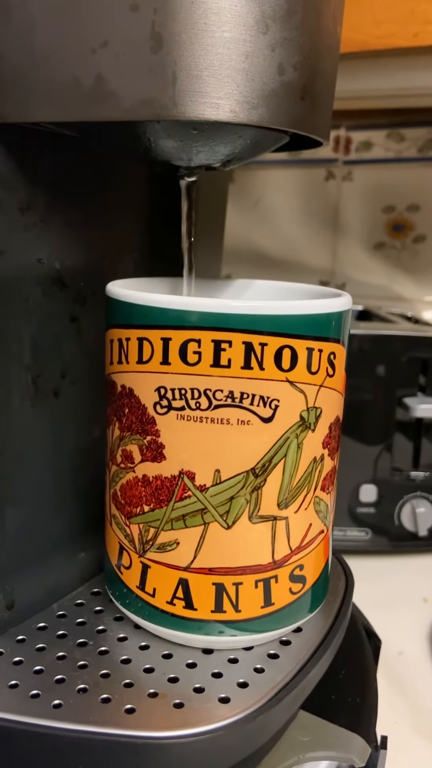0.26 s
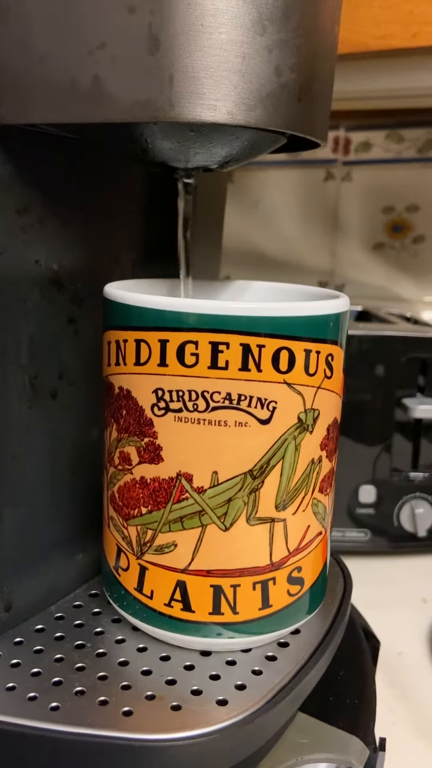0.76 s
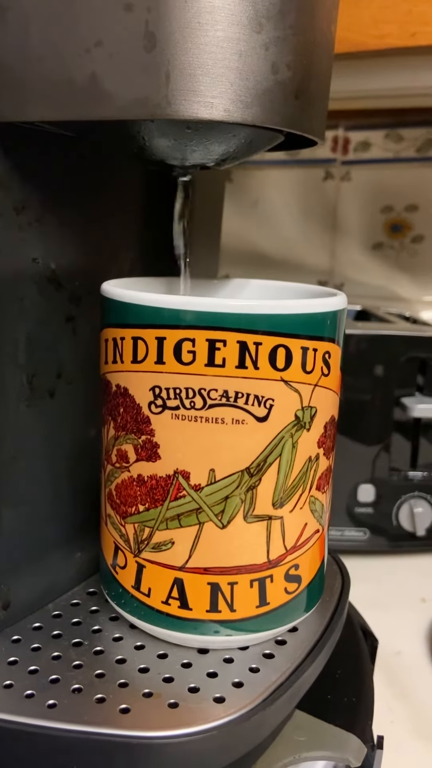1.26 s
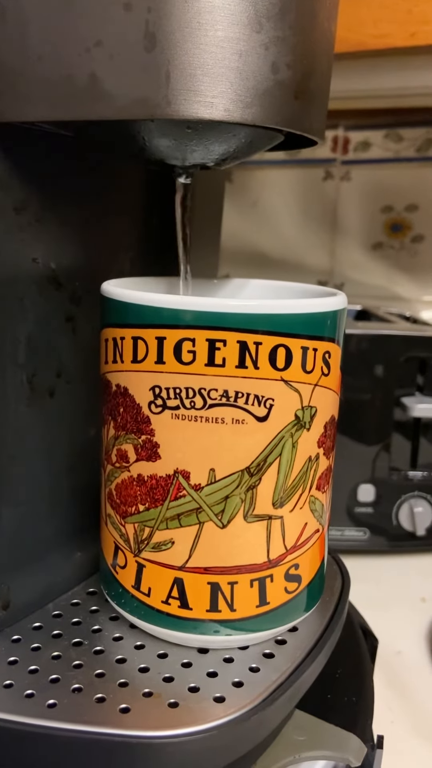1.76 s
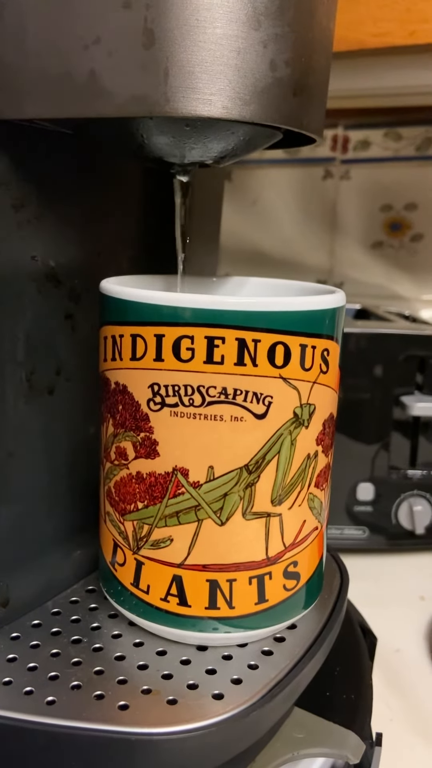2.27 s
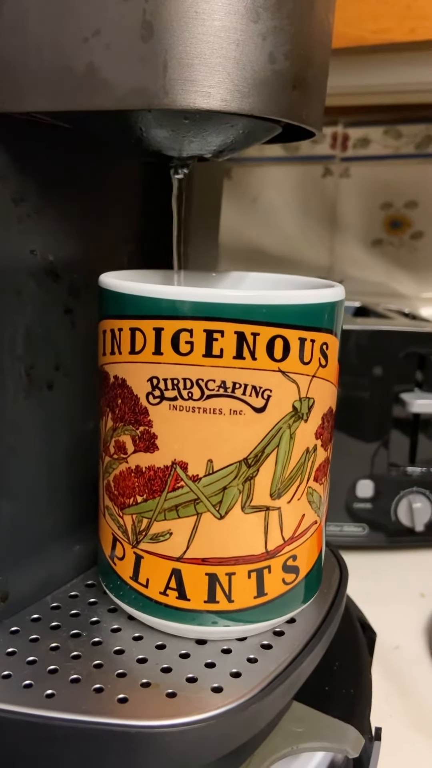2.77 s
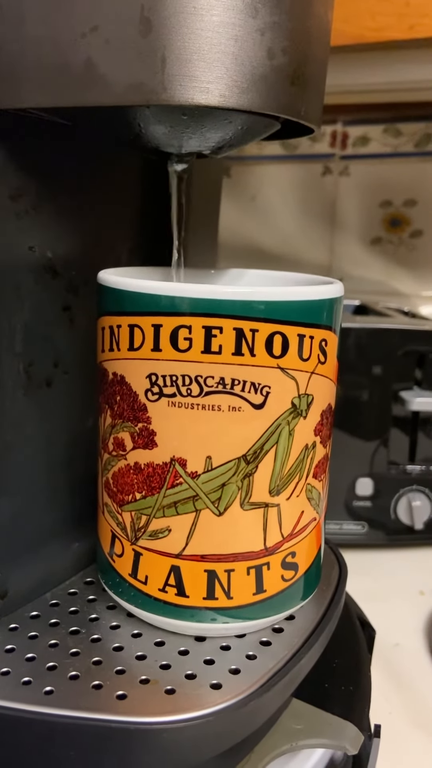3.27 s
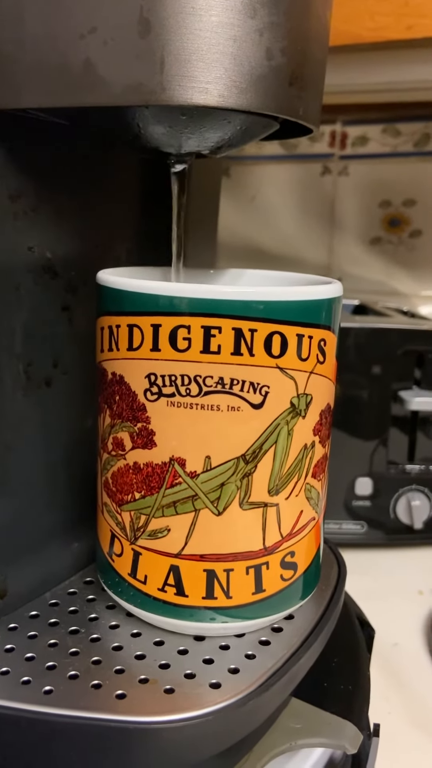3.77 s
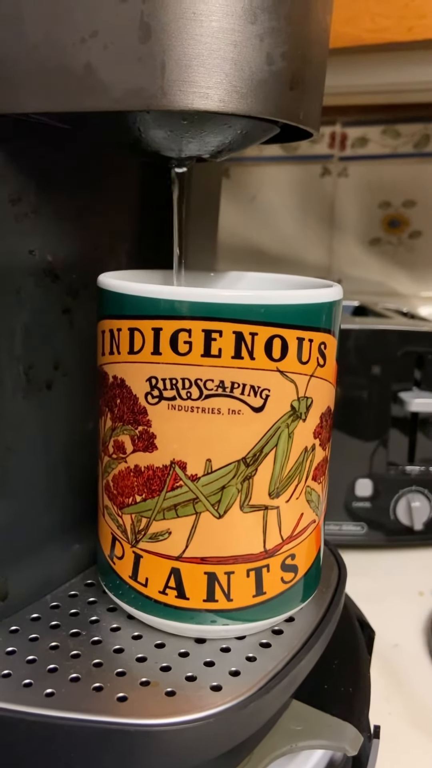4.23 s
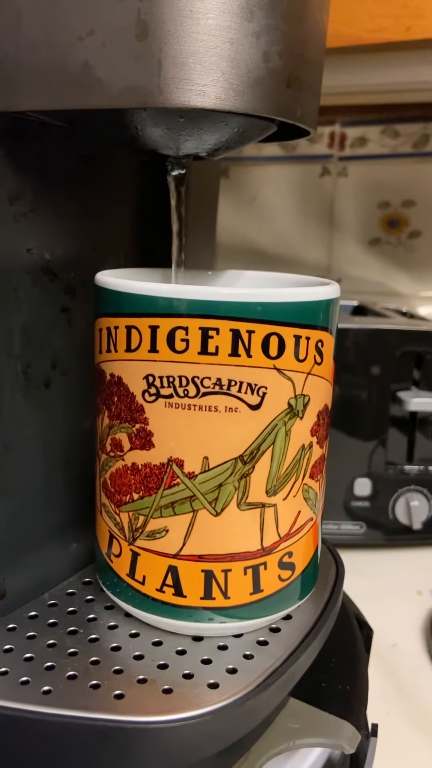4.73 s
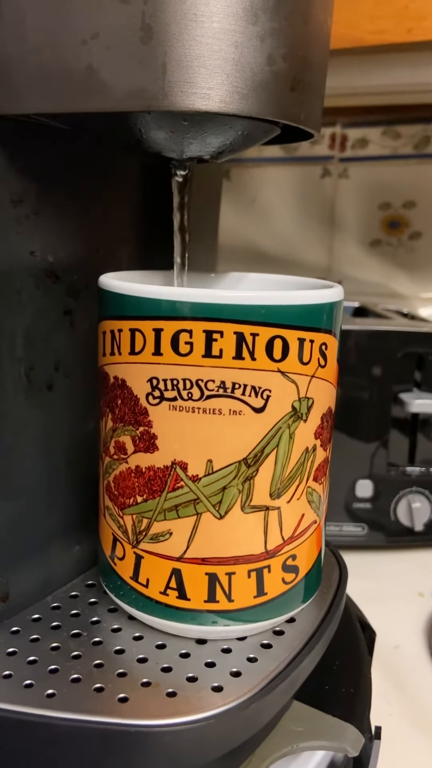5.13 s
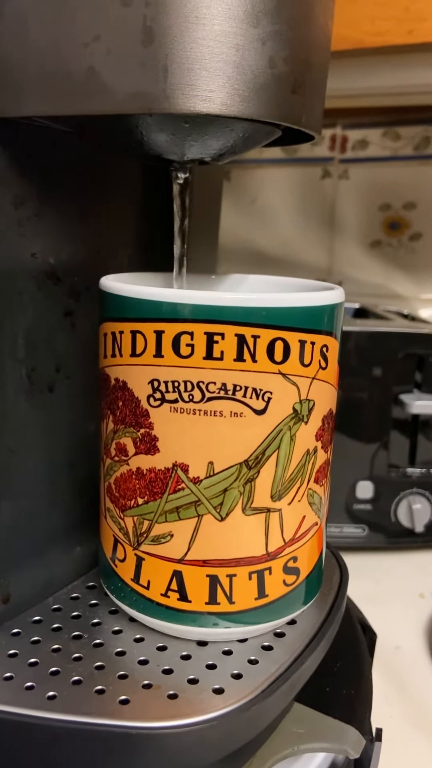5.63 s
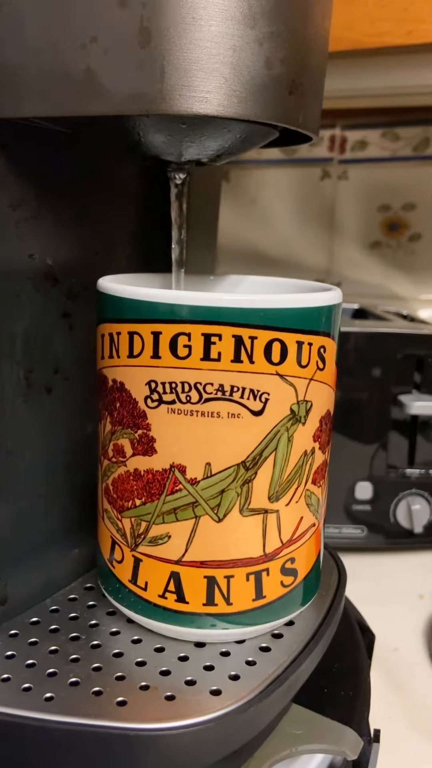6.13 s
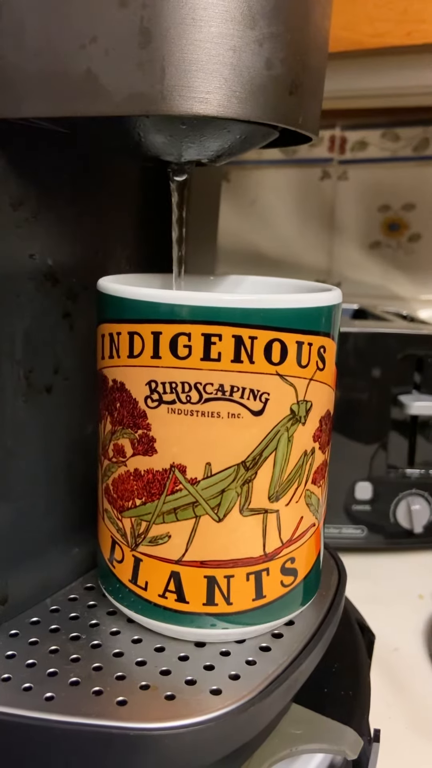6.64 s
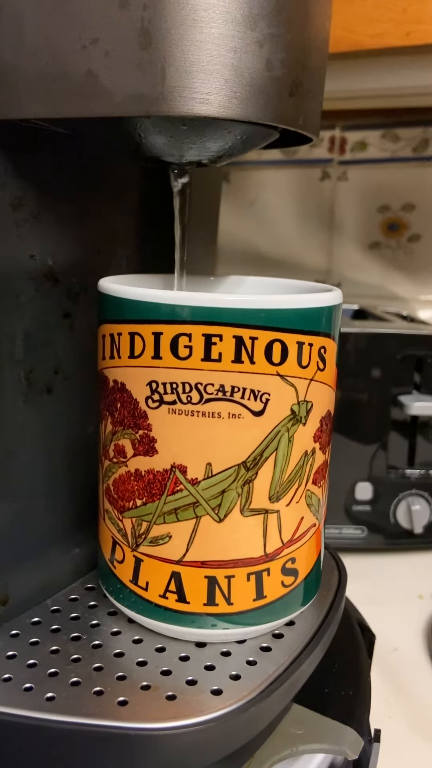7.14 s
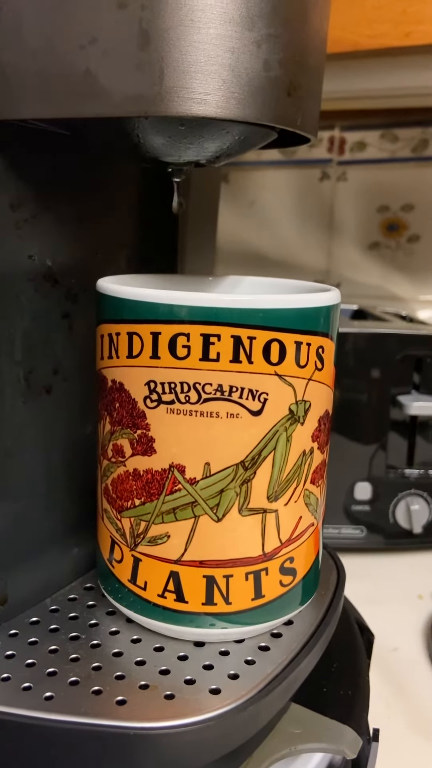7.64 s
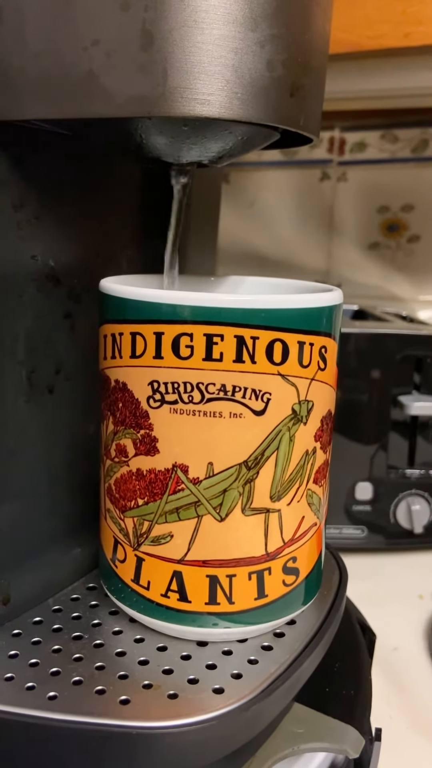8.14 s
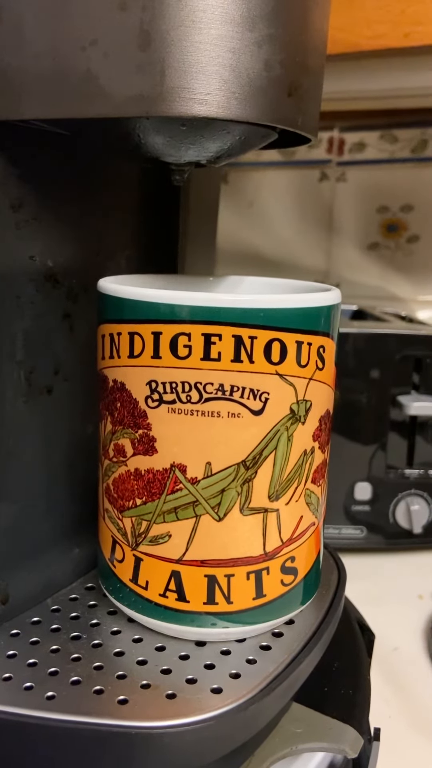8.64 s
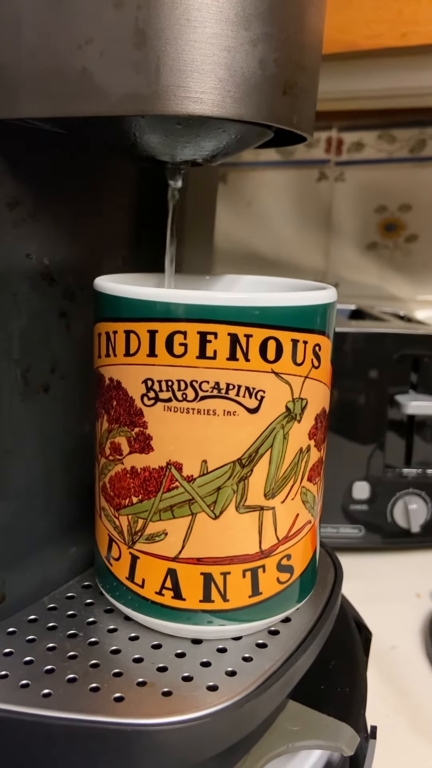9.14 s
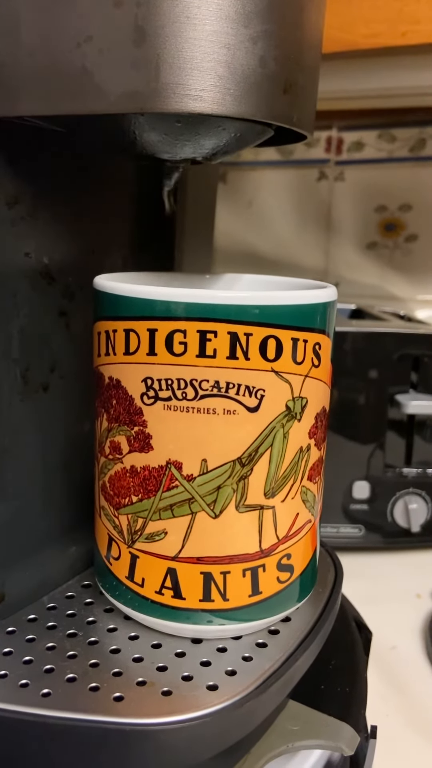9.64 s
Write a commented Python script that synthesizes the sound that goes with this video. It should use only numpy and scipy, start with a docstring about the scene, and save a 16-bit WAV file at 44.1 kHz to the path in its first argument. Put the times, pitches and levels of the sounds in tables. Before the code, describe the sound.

Water runs into a mug with small plops over a pump's hum, until the coffee maker sputters with bubbling air and hissing spurts.

```python
"""A coffee machine's pump hums while water runs into a mug, where bubbles plop and droplets tick.
Then the pump runs dry, speeds up and drives air through the wet nozzle. The air breaks through
the water in gurgles and pops that ring the hollow brew head, and steam spits out in bursts.
It is all heard in a small kitchen, close to a microphone with two ports (left and right openings)."""
import sys
import numpy as np
from scipy import signal
from scipy.fft import rfft, irfft
from scipy.io import wavfile
from scipy.ndimage import uniform_filter1d

SR = 44100
rng = np.random.default_rng(int(sys.argv[2]) if len(sys.argv) > 2 else 0)


def output_pcm(signal):
    """Save a mono or channel-first signal as 16-bit PCM at the path in sys.argv[1].

    Samples are clipped to [-1, 1] before scaling.
    """
    pcm = np.clip(np.atleast_2d(signal).T, -1, 1) * 32767
    wavfile.write(sys.argv[1], SR, np.round(pcm).astype(np.int16))


N = 436590
T = np.arange(N) / SR

# Air seeping through the nozzle between bursts: (time [s], gurgle level [dB], hiss level [dB])
SEEP = [(5.55, -90, -58.5), (5.82, -49, -59), (6.07, -44.5, -62.5), (6.4, -42, -61), (6.82, -55, -57.5),
        (7.06, -48, -68), (7.14, -60, -76), (7.27, -40.5, -93), (7.285, -42.5, -61.5), (7.62, -43.5, -59.5),
        (7.86, -55, -61.5), (8.1, -39, -59), (8.32, -50, -70), (8.36, -44, -63), (8.7, -41.5, -56),
        (9.0, -41.5, -63.5), (9.11, -49, -78), (9.2, -41.5, -62.5), (9.46, -51, -68), (9.52, -50, -99),
        (9.55, -43, -88), (9.8, -43, -66.5), (9.84, -51, -90), (9.9, -43, -82)]
# Slugs of air breaking through the water: (start [s], length [s], level [dB])
GURGLES = [(5.665, 0.043, -56), (5.89, 0.12, -28.5), (6.925, 0.056, -31), (7.28, 0.054, -41),
           (7.385, 0.012, -36), (7.56, 0.09, -38), (7.925, 0.14, -27), (8.205, 0.053, -38),
           (8.4, 0.023, -38.5), (8.8, 0.14, -30), (9.12, 0.067, -41)]
# Spurts of steam: (start [s], length [s], level [dB])
SPURTS = [(5.885, 0.056, -45), (6.65, 0.066, -57), (6.89, 0.065, -45.5), (7.68, 0.047, -57),
          (7.89, 0.13, -46), (8.09, .01, -69), (8.205, 0.015, -59), (8.56, 0.011, -55), (8.70, 0.058, -52),
          (8.795, 0.072, -48.5), (9.055, 0.005, -57.5), (9.225, 0.014, -55.5), (9.6, 0.023, -66.5),
          (9.865, .02, -66)]
# Single air pops: (time [s], peak level [dB], brightness [dB per octave])
POPS = [(5.663, -43, 12), (5.673, -32.5, 18), (5.699, -33, 21), (5.714, -33, 5), (5.848, -32, 27),
        (5.861, -29, 34), (5.878, -21, 27), (5.884, -26, 11), (5.902, -24, 38), (5.913, -17.5, -2),
        (5.98, -14.5, -5), (5.991, -15, -21), (6.01, -28, -4), (6.03, -27, -1), (6.048, -28.5, 9),
        (6.131, -30, 3), (6.188, -26.5, 16), (6.221, -28, -18), (6.307, -33, -32), (6.332, -23.5, -11),
        (6.442, -26.5, -14), (6.462, -23.5, -13), (6.498, -20.5, -34), (6.525, -23.5, -24),
        (6.595, -30, -3), (6.659, -21.5, -12), (6.864, -25, 25), (6.901, -14.5, -8), (6.917, -12.5, -11),
        (6.93, -27.5, 8), (6.953, -31, -14), (6.966, -17, 16), (6.979, -24.5, 11), (6.996, -26, 4),
        (7.07, -27, -12), (7.13, -27, -6), (7.161, -29.5, 4), (7.177, -27.5, -2), (7.227, -28, -5),
        (7.28, -30, 5), (7.291, -36.5, -17), (7.314, -33, 13), (7.361, -19.5, -22), (7.379, -36, -22),
        (7.5, -20.5, -32), (7.542, -23.5, -12), (7.56, -21, -34), (7.662, -24.5, -9), (7.677, -27.5, -10),
        (7.733, -30, -5), (7.931, -15, -26), (7.954, -16, 5), (7.976, -28, -34), (8.023, -21, 24),
        (8.047, -24, -6), (8.07, -26.5, -4), (8.119, -32.5, -6), (8.144, -33, 4), (8.163, -30, 11),
        (8.212, -21, -4), (8.241, -21.5, -41), (8.262, -32, -12), (8.306, -25.5, -7), (8.346, -29, -18),
        (8.415, -25, -10), (8.525, -23, -13), (8.558, -18, -22), (8.569, -22, -22), (8.658, -29, 2),
        (8.708, -19, -19), (8.722, -20.5, -5), (8.789, -22, -5), (8.8, -29.5, 4), (8.878, -20.5, -5),
        (8.901, -15.5, -6), (8.924, -20.5, 4), (8.949, -20, -12), (8.981, -21.5, -1), (9.064, -29, 17),
        (9.119, -27.5, 5), (9.218, -27.5, 10), (9.227, -25.5, 6), (9.269, -23, 14), (9.316, -24, 5),
        (9.329, -19, -9), (9.361, -22.5, 13), (9.376, -24.5, 12), (9.419, -25, 8), (9.45, -22, -15),
        (9.548, -23, -16), (9.568, -28, -4), (9.616, -26, 15), (9.667, -28.5, -5), (9.732, -25, 7),
        (9.783, -28, 14), (9.84, -32, 8), (9.881, -25, 9)]
# Ringing air spaces of the brew head: (pitch [Hz], width [Hz], level [dB])
HEAD_RINGS = [(427, 11, -29.5), (453, 9.1, -5.5), (541.5, 31.7, 8), (647.5, 113, -1.5), (695, 40, 3.5),
              (772, 24, -1.5), (813, 60, -9.5), (960, 32, -0.5), (1051, 24, 1.5), (1087, 120, -17)]
# Tone of the steam hiss: (frequency [Hz], level [dB])
STEAM_TONE = [(1400, 12), (1800, 6.5), (2400, 5.5), (3200, 4.5), (4500, 4.5), (6000, -4), (8500, 3.5),
              (10000, -29), (15000, -39)]
# Fizzy top of the hiss: (frequency [Hz], level [dB])
FIZZ_TONE = [(8500, -8), (10000, 8.5), (12000, 1.5), (13500, 3), (15000, -4)]
# Whistles of the nozzle: (pitch [Hz], width [Hz], level [dB])
WHISTLES = [(2430, 110, -13), (2850, 150, -14), (3500, 200, -15), (4600, 300, -4), (5500, 500, -8),
            (12100, 120, -9)]
# Bubbles in the mug: (time [s], level [dB], pitch [Hz])
PLOPS = [(0.079, -23, 776), (0.241, -28, 785), (0.294, -17, 782), (0.575, -32.5, 1250), (0.752, -23.5, 846),
         (0.893, -24.5, 870), (0.935, -30, 820), (0.997, -33, 1170), (1.018, -21.5, 770), (1.265, -25, 790),
         (1.545, -21, 844), (1.706, -28.5, 1000), (1.848, -25.5, 795), (2.043, -30.5, 1300),
         (2.16, -31, 1330), (2.446, -34, 1250), (2.585, -28, 920), (2.861, -25, 790), (2.907, -26.5, 1070),
         (2.978, -21, 820), (3.329, -18.5, 1265), (3.465, -28, 805), (3.773, -27, 980), (3.812, -27.5, 900),
         (4.285, -27, 1200), (4.395, -23.5, 804), (4.446, -30.5, 975), (4.536, -27.5, 804), (4.6, -31, 800),
         (5.8475, -40, 1950), (5.863, -30, 1770), (6.413, -40.5, 1820), (6.866, -35, 1930),
         (7.0234, -43, 1890), (7.07, -47, 2090), (7.0953, -40.5, 1850), (7.099, -42.5, 2620),
         (7.15, -46, 1950), (7.179, -41, 1760), (7.897, -33, 1960), (8.014, -34, 2460), (8.7467, -35, 2460),
         (8.949, -43, 1560), (9.169, -39, 1560), (9.1853, -34.5, 1560), (9.256, -45, 1550),
         (9.2746, -39, 1550), (9.302, -45, 2710), (9.338, -34, 1550), (9.404, -47, 2700),
         (9.45, -50.5, 2350)]
# Splashed droplets: (time [s], level [dB], centre frequency [Hz])
TICKS = [(0.283, -37, 6360), (0.6894, -35, 4960), (0.935, -29, 7300), (2.0435, -28, 4650),
         (2.214, -34.5, 5000), (2.312, -33, 6300), (2.7875, -32.5, 10400), (2.862, -37, 6110),
         (3.262, -33, 5000), (3.463, -29, 6110), (4.287, -30.5, 5330), (4.361, -33.5, 6130),
         (5.846, -33, 4350), (5.883, -29, 4720), (6.8574, -33, 4560), (7.2835, -43.5, 4100),
         (7.893, -42, 4530), (7.925, -35, 4640), (7.958, -29.5, 4240), (8.097, -44, 5170),
         (8.1448, -33, 4740), (8.2054, -38.5, 5000), (8.359, -39, 6040), (8.572, -48, 4000),
         (8.683, -39, 4480), (8.792, -32, 4520), (9.037, -42, 4590), (9.135, -37.5, 5140),
         (9.1715, -42, 5220), (9.257, -42, 9000), (9.2753, -39.5, 5210), (9.338, -43.5, 5000),
         (9.4034, -58, 4000), (9.5935, -53, 4580), (9.864, -50.5, 4320)]
# Notes of the mug's wall: (pitch [Hz], level [dB], time to fade by 60 dB [s])
MUG_RINGS = [(1560, -15, 0.052), (3590, -1.5, 0.023), (5170, -18, 0.025), (12500, -28, 0.02)]
# Strength of the water stream: (time [s], level [dB])
FLOW = [(0, -51), (3.8, -51), (4.2, -53), (4.65, -54), (5.0, -53), (5.4, -56.5), (5.8, -59), (6, -45)]
# Tone of its spray: (frequency [Hz], level [dB])
SPRAY_TONE = [(350, 2.5), (450, -5), (710, -7.5), (800, -1), (1000, 3.5), (1400, -13.5), (2000, -7),
              (2420, -12), (2900, -10.5), (4000, -14), (6000, -23), (8000, -27.5), (11000, -26.5),
              (13000, -37), (15500, -36.5)]
# The pump shaft speeds up when dry and sags as pressure builds: (time [s], speed [turns per s])
SHAFT_SPEED = [(0, 28.715), (4.25, 28.715), (4.6, 30), (5.2, 35.5), (5.8, 37.2), (5.95, 27.5), (6.4, 28),
               (6.9, 29), (7.15, 32.6), (7.85, 33.3), (8.6, 36.6), (9.15, 41.4), (9.9, 41.5)]
# The hum swells as pressure builds before big spurts: (time [s], rumble level [dB], hum level [dB])
PUMP_LEVELS = [(0, -53.5, -48.5), (4.2, -48.5, -49), (4.5, -44, -63), (4.75, -54, -55), (5.2, -50, -72),
               (5.5, -49, -71), (5.75, -53, -54), (5.97, -44, -45.5), (6.25, -60, -65.5), (6.45, -52, -52),
               (6.66, -53.5, -54), (6.82, -59, -41.5), (6.95, -38, -61), (7.1, -55, -54.5),
               (7.33, -43, -66), (7.6, -53, -59.5), (7.83, -57, -44.5), (8.0, -47, -56), (8.3, -50, -72),
               (8.6, -52, -52), (8.8, -58, -65), (9.9, -57, -61.5)]
# Notes of the hum: (pitch [times shaft speed])
HUM_MULTIPLES = [2, 3, 4, 5, 6, 7, 8, 9, 10, 11]
# Their strengths; three pump chambers stress every third multiple: (level [dB])
HUM_DB = [-11, -13, -25, -37, 2, -7, -9.5, 0, -29, -15.5]
# Notes of the whine while water loads the pump: (pitch [times shaft speed])
WHINE_MULTIPLES = [13, 14, 15, 18, 20, 21, 22, 23, 24, 25, 35, 38, 39, 40, 41, 42, 45, 76]
# Their strengths: (level [dB])
WHINE_DB = [-14, -4, -13, -8, -2, -13, -16, -16, -16, -16, -11, -18, -13, -2.5, -8, -17, -18, -16]
# The whine dies as the pump runs dry: (time [s], level [dB])
WATER_LOAD = [(0, -49.5), (4.21, -49.5), (4.27, -70), (4.8, -88), (9.9, -90)]
# How well the case gives off the hum: (frequency [Hz], gain [dB])
CASE_TONE = [(50, -9), (90, 2), (130, 10), (170, -2), (210, 1.5), (255, 1), (300, -4.5), (335, -8.5),
             (375, 5.5), (420, -22)]
# Ringing of the pump's housing: (pitch [Hz], width [Hz], level [dB])
HOUSING_RINGS = [(54.3, 17.5, -20.5), (164, 24.5, -5), (210.6, 15, 0.5), (285, 62, -33), (422.3, 37, -7.5)]
# Ringing of the hoses: (pitch [Hz], width [Hz], level [dB])
HOSE_RINGS = [(289.9, 34.8, 3.5), (314.4, 8.3, -6)]
# Water surging in the hoses: (time [s], level [dB])
SURGE = [(0, -44), (2, -43), (4.15, -44.5), (4.5, -47.5), (4.8, -54.5), (5.75, -53.5), (6.0, -58),
         (8.2, -82), (8.8, -50), (9.15, -60), (9.9, -65)]
# Tone of the room's quiet background: (frequency [Hz], level [dB])
ROOM_TONE = [(20, -56), (40, -52), (60, 3.5), (120, -11.5), (300, 2.5), (380, -17), (600, -1.5), (715, -11),
             (800, -3), (1200, -6), (1500, -22.5), (3000, -34), (7000, -45), (15000, -40)]
# How long the kitchen echoes: (frequency [Hz], time to fade by 60 dB [s])
ECHO_TIMES = [(100, 0.17), (1000, 0.07), (10000, 0.04)]
# Level of the spread-out stereo wash, with three deep treble gaps: (frequency [Hz], gain [dB])
WASH_LEVELS = [(40, -24), (150, -37), (300, -12.5), (450, -1.5), (800, -5.5), (1050, -6), (2000, 2),
               (4500, -7.5), (6300, 0.5), (7500, -34), (8800, 3), (10500, -27), (12000, 5), (13500, -37)]
# Pump and stream reach the left port duller: (frequency [Hz], gain [dB])
LEFT_SHADE = [(300, 0), (400, -4), (517, -1), (575, -11), (650, -8), (720, 0)]
# Left-right phase difference that sets the stereo width, with flat steps in the treble:
# (frequency [Hz], phase [radians])
STEREO_PHASE = [(50, 0), (180, -.55), (330, -1.5), (450, -4), (1100, -4.1), (1780, -6.6), (2700, -4.3),
                (5200, -6.1), (6800, -3.14), (8100, -3.14), (9600, 0), (11400, 0), (12600, 3.14),
                (14700, 3.14), (15400, 6.2)]
# How much louder the left port is than the right: (frequency [Hz], gain [dB])
LEFT_GAIN = [(80, .6), (220, -1.5), (350, -5), (450, -6.5), (600, -4.5), (800, -4), (1050, 0), (1300, 2),
             (2500, -1.5), (4500, -3), (5500, 0)]


def nozzle():
    """Air forced through the wet nozzle gurgles, hisses and pops once the water runs out."""
    gurgle_seep_db, hiss_seep_db = curves(SEEP)
    gurgle_db = bursts(GURGLES, gurgle_seep_db, swell=1800, sag=29, fall=440)
    hiss_db = bursts(SPURTS, hiss_seep_db, swell=900, sag=31, fall=300)
    fade_in = np.clip((T - 5.55) / 0.1, 0, 1)
    return fade_in * (gurgle(gurgle_db) + steam(hiss_db)) + pops()


def bursts(rows, seep_db, swell, sag, fall):
    """Level in dB of bursts over the seep; each swells, sags and falls at rates in dB per second."""
    start, length, db = np.transpose(rows)[..., None]
    t = T[::40]
    burst_db = db - swell * np.maximum(start - t, 0)
    burst_db -= sag * np.clip(t - start, 0, length)
    burst_db -= fall * np.maximum(t - start - length, 0)
    power = amp(2 * seep_db) + np.interp(T, t, amp(2 * burst_db).sum(0))
    return 10 * np.log10(power)


def gurgle(level_db):
    """A dense patter of bubbles rings the brew head and shakes the case."""
    per_s = 130 + 500 * amp(np.minimum(level_db + 31.5, 0))  # harder bursts make more bubbles
    patter = 0
    for size in (0.985, 1.015):
        bubbles = np.sqrt(29 / per_s) * clicks(per_s, spread_db=1.7) + 0.15 * rng.standard_normal(N)
        patter += brew_head(bubbles, tilt_db=0.5, air_size=size)
    case = ringing_noise([(70.4, 61, -3.5), (103, 31, -4.5), (154, 24, 1), (248, 107, 2.5)])
    return amp(level_db + 1) * unit_level(patter) + amp(-50.5 + 0.51 * (level_db + 40.5)) * case


def pops():
    """Each pop is a sharp puff of air that starts all of the head's air spaces ringing together."""
    out, t = np.zeros(N), np.arange(3000) / SR
    for start, db, tilt_db in POPS:
        puff = 0.29 * rng.standard_normal(len(t)) * decay(t, 0.0025) + 3.8 * (t == 0)
        body = brew_head(puff, tilt_db, air_size=rng.uniform(0.99, 1.064), ratio=0.83, damp_hz=84)
        body *= decay(t, 0.16)  # water damps the ring
        add(out, start, amp(db) * body / abs(body[60:]).max())  # peak after the first swing
    return out


def brew_head(x, tilt_db, air_size, ratio=-1, damp_hz=0):
    """Air spaces ring, their pitches shifted by a small detune that differs from sound to sound; a negative
    ratio makes neighbours swing opposite ways."""
    out = 0
    for k, (hz, width, db) in enumerate(HEAD_RINGS):
        damping = damp_hz * (hz / 1000) ** 3
        gain = ratio ** k * amp(db + tilt_db * np.log2(hz / 700)) * (1 + damping / width)
        out += gain * ring(x, hz / air_size, width + damping)
    cut_treble = signal.cheby2(10, 45, 1430, fs=SR, output="sos")
    return signal.sosfilt(cut_treble, out)


def steam(level_db):
    """Gusts of steam hiss through the nozzle; harder bursts whistle and fizz more."""
    gusts = rng.standard_normal(N) + 0.4 * clicks(per_s=1100, spread_db=5.5)
    gusts *= amp(2.5 * drift(per_s=180) + 1.5 * drift(per_s=60))
    whistles = sum(amp(db + 3 * drift(per_s=35)) * unit_level(ring(gusts, hz, width))
                   for hz, width, db in WHISTLES)
    whistles *= amp(0.55 * (level_db + 46))
    fizz = amp(-1 + 0.56 * (level_db + 44.5)) * colour(gusts, FIZZ_TONE)
    return amp(level_db - 1.5) * (colour(gusts, STEAM_TONE) + whistles + fizz)


def plops():
    """Bubbles ring in the mug: each note drops from a bright slap, then slowly rises."""
    out, t = np.zeros(N), np.arange(5000) / SR
    attack = np.minimum(t / 0.00081, 1)
    slap = 0.0003 * (1 - np.exp(-t / 0.001))
    wall = 0.31 * np.sin(2 * np.pi * MUG_RINGS[0][0] * t) * decay(t, 0.026)
    for start, db, hz in PLOPS:
        bubble = np.sin(2 * np.pi * hz * (t + 0.32 * t ** 2 + slap))
        splash = 0.85 * ring(rng.standard_normal(len(t)), 0.6 * hz, width=720) * decay(t, 0.034)
        fade = decay(t, 0.014 + 7.1 / hz)  # low bubbles ring longer
        add(out, start, amp(db) * attack * fade * (bubble + wall + splash))
    return out


def droplets():
    """Each droplet is a tick of bright noise; late ones strike the mug's bare wall and ring it."""
    out, t = np.zeros(N), np.arange(5000) / SR
    wall_from_s = 7.2
    wall = sum(amp(db - 5.5) * decay(t, fade_s) * np.sin(2 * np.pi * hz * t)
               for hz, db, fade_s in MUG_RINGS)
    for start, db, hz in TICKS:
        noise = rng.standard_normal(len(t)) * decay(t, 0.023)
        tick = ring(noise, hz, width=3000) + 0.34 * np.diff(noise, prepend=0)
        add(out, start, amp(db) * (tick / abs(tick).max() + (start > wall_from_s) * wall))
    return out


def stream():
    """Running water makes fine spray and small random bubbles, fading as the flow thins."""
    spray = colour(rng.standard_normal(N) + 0.4 * clicks(per_s=1500, spread_db=2.5), SPRAY_TONE)
    spray *= 1.49 * amp(drift(per_s=40))
    bubbles = sum(unit_level(ring(clicks(per_s=60, spread_db=4), hz, hz / 10))
                  for hz in (790, 980, 1250, 1550, 1950, 2190))
    bubbles *= amp(-14 - 10 * np.clip(T - 4.2, 0, 1))
    fade_out = np.clip((6.05 - T) / 0.19, 0, 1)
    return amp(curves(FLOW)[0]) * fade_out * (spray + bubbles)


def pump_hum():
    """The pump's strokes hum and whine at multiples of the shaft speed, wavering a little in level."""
    speed = curves(SHAFT_SPEED)[0]
    turns = np.cumsum(speed) / SR
    wavers = [amp(1.2 * drift(per_s=5)) for _ in range(4)]

    def note(k, db):
        return np.sqrt(2) * amp(db) * wavers[k % 4] * np.sin(2 * np.pi * (k * turns + rng.random()))
    hum = sum(note(k, db + look_up(CASE_TONE, k * speed)) for k, db in zip(HUM_MULTIPLES, HUM_DB))
    whine = sum(note(k, db) for k, db in zip(WHINE_MULTIPLES, WHINE_DB))
    return amp(curves(PUMP_LEVELS)[1]) * hum + amp(curves(WATER_LOAD)[0]) * whine


def pump_rumble():
    """The pump's rough noise rings in its plastic housing and hoses."""
    housing = amp(curves(PUMP_LEVELS)[0]) * ringing_noise(HOUSING_RINGS)
    hoses = amp(curves(SURGE)[0] + 0.63 * drift(per_s=44)) * ringing_noise(HOSE_RINGS)
    return housing + hoses


def kitchen_echoes(x):
    """Three sets of short echoes crossfade at random, so the room sounds smooth, not hollow."""
    taps = np.zeros((3, 2, 8800))  # three sets for each of two ports
    arrivals = np.arange(60, 8760, 20) + rng.integers(0, 20, (3, 2, 435))
    np.put_along_axis(taps, arrivals, rng.choice([-1., 1.], arrivals.shape), 2)
    hz, t, bands = signal.stft(taps, SR, nperseg=256)
    fade = decay(t, look_up(ECHO_TIMES, hz)[:, None])
    bands *= fade / np.linalg.norm(fade, axis=1, keepdims=True)
    scale = np.linalg.norm(signal.istft(bands, SR, nperseg=256)[1][0, 0])
    bands *= amp(look_up(WASH_LEVELS, hz))[:, None]
    tails = signal.istft(bands, SR, nperseg=256)[1] / scale
    shares = np.sqrt(2 / 3) * np.cos(np.pi * (1.5 * drift(per_s=8) + np.arange(3)[:, None] / 3))
    return signal.oaconvolve((x * shares)[:, None], tails, axes=2)[..., :N].sum(0)


def background_rumble():
    """A faint low rumble, separate at each port."""
    tone = [(25, -14), (60, -8), (110, -12), (300, -36), (20000, -96)]
    return amp(-66.5) * np.array([colour(rng.standard_normal(N), tone) for _ in range(2)])


def amp(db):
    """Turn decibels into a multiplier."""
    return 10 ** (np.asarray(db) / 20)


def decay(t, fade_s):
    """Fade by 60 dB every fade_s seconds."""
    return amp(-60 * t / fade_s)


def unit_level(x):
    """Scale x to an average power of 1."""
    return x / np.sqrt(np.mean(x ** 2) + 1e-20)


def look_up(points, hz):
    """Read a (frequency, value) table between its rows."""
    freqs, values = np.transpose(points)
    return np.interp(np.log(hz + 1), np.log(freqs + 1), values)


def curves(rows):
    """Join the rows of a time table into one curve per value column."""
    times, *columns = np.transpose(rows)
    return [np.interp(T, times, column) for column in columns]


def add(mix, start, sound):
    """Mix a sound in at a start time in seconds."""
    part = mix[round(start * SR):][:len(sound)]
    part += sound[:len(part)]


def colour(x, points):
    """Give x the tone of a (frequency [Hz], level [dB]) table, falling away below its first row."""
    hz = np.fft.rfftfreq(N, 1 / SR)
    tone = [(points[0][0] / 2, points[0][1] - 30)] + list(points)
    return unit_level(irfft(rfft(x) * amp(look_up(tone, hz)), N))


def ring(x, hz, width):
    """Let x ring at one pitch; a narrower width in Hz rings longer."""
    r = np.exp(-np.pi * width / SR)
    return signal.lfilter([1 - r, 0, r - 1], [1, -2 * r * np.cos(2 * np.pi * hz / SR), r * r], x)


def ringing_noise(rings):
    """Noise ringing in steep bands: (pitch [Hz], width [Hz], level [dB])."""
    noise = rng.standard_normal(N)
    return unit_level(sum(amp(db) / np.sqrt(width) * ring(ring(noise, hz, width), hz, 2 * width)
                          for hz, width, db in rings))


def drift(per_s):
    """A smooth random wobble that changes about per_s times a second."""
    size = max(int(SR / per_s), 1)
    return unit_level(uniform_filter1d(uniform_filter1d(rng.standard_normal(N), size), size))


def clicks(per_s, spread_db):
    """Scattered random clicks, a few of them large."""
    size = amp(spread_db * np.minimum(rng.exponential(1, N), 4)) * rng.standard_normal(N)
    return unit_level(size * (rng.random(N) < per_s / SR))


def scene():
    """Mix machine, mug and room for the left and right ports."""
    hz = np.fft.rfftfreq(N, 1 / SR)
    running = pump_rumble() + stream()
    centred = plops() + droplets() + nozzle()
    centred += amp(-53.5) * colour(rng.standard_normal(N), ROOM_TONE)
    shade = np.array([amp(look_up(LEFT_SHADE, hz)), np.ones_like(hz)])
    shaded = irfft(rfft(running + pump_hum()) * shade, N)
    return shaded + centred + background_rumble() + kitchen_echoes(running + centred)


def record(dry):
    """Left and right get their own level and phase at each frequency; the top treble is cut."""
    hz = np.fft.rfftfreq(N, 1 / SR)
    left = amp(look_up(LEFT_GAIN, hz) / 2) * np.exp(0.5j * look_up(STEREO_PHASE, hz))
    ports = irfft(rfft(dry) * np.array([left, 1 / left]), N)
    cut_treble = signal.firwin(511, cutoff=15900, window=("kaiser", 9), fs=SR)
    return signal.oaconvolve(ports, cut_treble[None], "same")


dry = scene()
out = record(dry)
output_pcm(out)
```